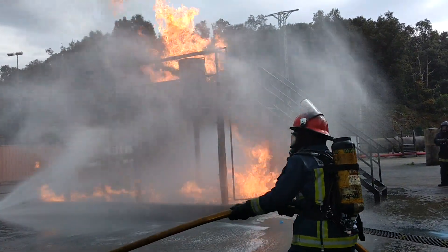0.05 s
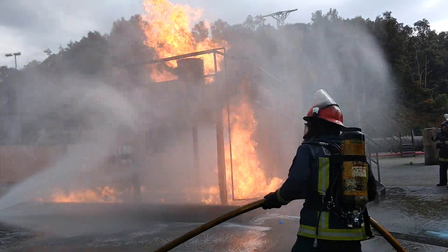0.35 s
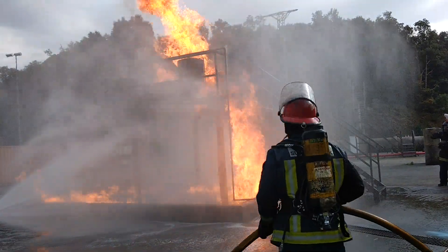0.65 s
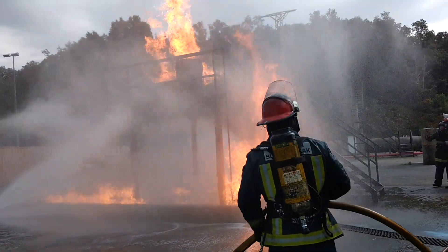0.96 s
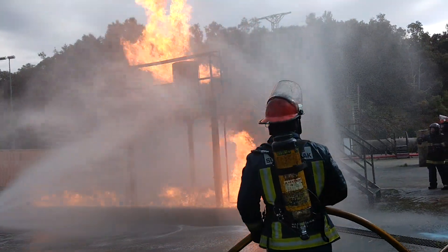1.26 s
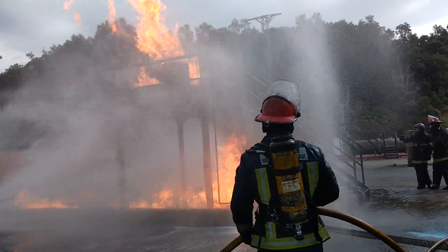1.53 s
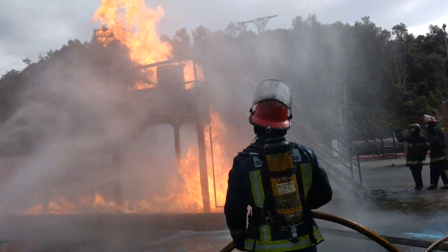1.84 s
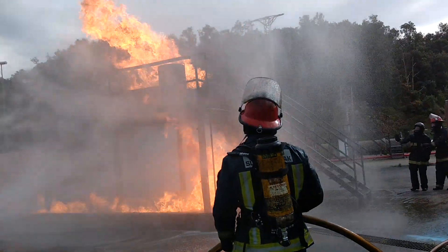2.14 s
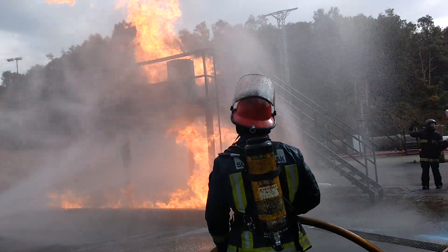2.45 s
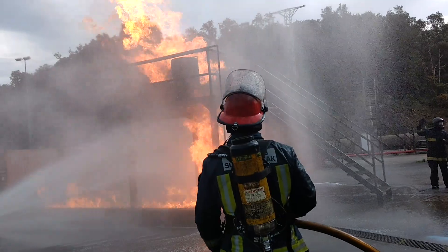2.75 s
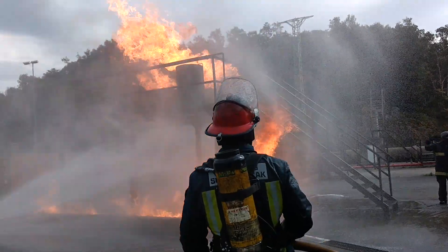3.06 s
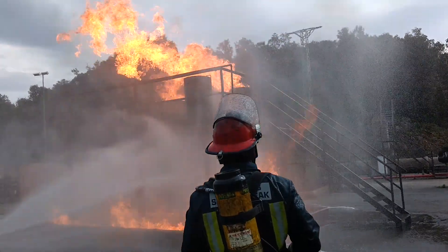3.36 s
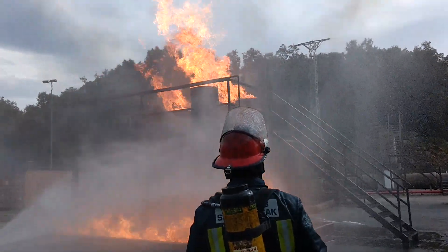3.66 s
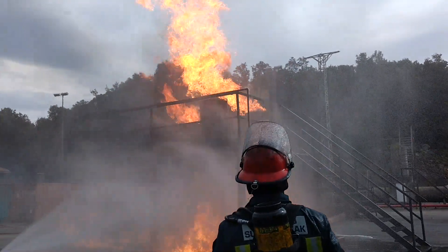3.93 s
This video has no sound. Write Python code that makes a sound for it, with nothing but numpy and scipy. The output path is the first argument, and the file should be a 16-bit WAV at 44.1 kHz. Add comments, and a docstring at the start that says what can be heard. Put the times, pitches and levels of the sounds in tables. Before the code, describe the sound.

Fire hoses rush and hiss steadily over low rumbling flames in an open yard.

```python
"""An open yard, where fire hoses play on a burning steel frame. The flames rumble, the jets drum and
splash on the steel, the spray hisses and its drops patter down. Gusts thump on the microphone, and a
thin whistle sounds near the end. Fire and water lie to one side, so the right channel hears the water
a little before the left."""
import sys
import numpy as np
from scipy import signal
from scipy.fft import rfft, irfft, next_fast_len
from scipy.io import wavfile
from scipy.ndimage import uniform_filter1d, map_coordinates

SR = 44100
rng = np.random.default_rng(int(sys.argv[2]) if len(sys.argv) > 2 else 0)


def generate_wav(signal):
    """Clip the signal to [-1, 1] and save it as 16-bit WAV at the path in sys.argv[1]."""
    frames = np.transpose(np.atleast_2d(signal))
    scaled = np.clip(frames, -1, 1) * 32767
    pcm = np.round(scaled).astype(np.int16)
    wavfile.write(sys.argv[1], SR, pcm)


N = 176400
TIME = np.arange(N) / SR


def amp(db):
    """Decibels to gain."""
    return 10 ** (np.asarray(db) / 20)


def unit_rms(x):
    """Normalise to rms 1."""
    return x / np.sqrt(np.mean(x ** 2) + 1e-20)


def over_frequency(points, hz):
    """Read (f/Hz, value) breakpoints on a log frequency axis."""
    freqs, values = np.transpose(points)
    return np.interp(np.log(hz + 1), np.log(freqs + 1), values)


def envelope(points):
    """Join (t/s, value) breakpoints, one value per sample."""
    return np.interp(TIME, *np.transpose(points))


def wobble(knots_per_s):
    """A smooth random modulator."""
    return map_coordinates(rng.standard_normal(1000), [TIME * knots_per_s + 2], mode="wrap")


def filtered(x, response):
    """Apply a complex frequency response."""
    size = next_fast_len(N + SR // 4)
    return irfft(rfft(x, size) * response(np.fft.rfftfreq(size, 1 / SR)), size)[..., :N]


def noise(eq, side_db, patchy_db):
    """Stereo noise of rms 1, mottled in time and frequency; side_db sets its width."""
    spectra = signal.stft(rng.standard_normal((2, N)), nperseg=512)[2]
    patches = uniform_filter1d(rng.standard_normal(spectra.shape[1:]), size=9, axis=0)
    patches = unit_rms(uniform_filter1d(patches, size=14, axis=1))
    mottled = signal.istft(spectra * amp(patchy_db * patches), nperseg=512)[1][:, :N]
    mid, side = filtered(mottled, lambda hz: amp(over_frequency(eq, hz)))
    return unit_rms(np.array([mid + amp(side_db) * side, mid - amp(side_db) * side]))


# Breeze bed between gusts: t/s, level/dB
BREEZE_LEVEL = [(0, -47), (.6, -43), (1.2, -50), (1.8, -44), (2.1, -40), (2.5, -43), (3.1, -40),
                (3.5, -38.5), (4, -41)]
# Gust hits: t/s, relative level/dB, half-width/s
GUST_HITS = [(0.44, -29.8, 0.03), (0.685, -23, 0.026), (0.726, -26, 0.03), (1.983, -24, 0.05),
             (2.132, -32, 0.03), (2.186, -25, 0.033), (2.566, -15, 0.015), (2.604, -25, 0.035),
             (2.8, -22, 0.03), (2.904, -24, 0.02), (2.943, -24, 0.04), (3.406, -29.2, 0.037),
             (3.46, -25, 0.027)]
# Bass-heavy tone of the buffeting: f/Hz, level/dB
WIND_EQ = [(20, -32), (35, -27), (55, -7), (80, 0), (110, 0), (160, -3), (220, -11), (320, -18), (600, -37),
           (1500, -65)]
def wind():
    """Eddies push the two channels in opposite directions: a light flutter and short thumps."""
    eddies = noise(WIND_EQ, side_db=-18, patchy_db=2.0) * np.array([[1], [-1]])
    gain = amp(envelope(BREEZE_LEVEL) + 3.3 * wobble(18))
    for peak_s, db, half_width in GUST_HITS:
        swell = np.exp(-2 * ((TIME - peak_s) / half_width) ** 2)
        local_rms = np.sqrt(np.average(eddies[0] ** 2, weights=swell ** 2))
        gain += amp(db - 8.0) * swell / local_rms
    return gain * eddies


# Whistle notes: t/s, length/s, starting f/Hz, level/dB
WHISTLE_NOTES = [(3.51, .08, 13830, -46), (3.655, .175, 13790, -49.5), (3.84, .11, 13770, -49.5)]
def whistle(sag_hz_per_s=450, waver_hz=14):
    """A faint, very high whistle comes and goes, sagging in pitch."""
    out = np.zeros(N)
    for start, length, hz, db in WHISTLE_NOTES:
        age = np.clip(TIME - start, 0, length)
        pitch = hz - sag_hz_per_s * age + waver_hz * wobble(50)
        fade = np.sqrt(np.abs(np.sin(np.pi * age / length)))
        out += amp(db) * fade * np.sin(2 * np.pi * np.cumsum(pitch) / SR)
    return out


def drops(per_s=900, centre_hz=4500, spread_octaves=2.6, cycles_per_20_db=3.5, level_db=-48):
    """Drops tick on the wet ground, each a few damped cycles."""
    when, pitch, size, pan = rng.random((4, int(per_s * N / SR), 1))
    hz = centre_hz * 2 ** (spread_octaves * (pitch - .5))
    age_samples = np.arange(160)
    cycles = hz * age_samples / SR
    accent_db = -2.5 * np.log(size + 1e-3)  # many soft ticks, a few loud ones
    ticks = amp(accent_db - 20 * cycles / cycles_per_20_db) * np.sin(2 * np.pi * cycles)
    slots = ((when * N).astype(int) + age_samples).ravel()
    patter = [np.bincount(slots, (ticks * gain).ravel(), N)[:N] for gain in (.5 + pan, 1.5 - pan)]
    return amp(level_db) * unit_rms(np.array(patter))


# Fader ride of the flames: t/s, relative level/dB
FIRE_LEVEL = [(0.0, -32), (0.08, -36.5), (0.18, -34), (0.4, -37.5), (0.51, -35.5), (0.56, -31),
              (0.63, -35.5), (0.83, -33.8), (1.1, -34), (1.14, -36), (1.65, -35), (1.9, -36), (2.27, -35),
              (2.7, -37.8), (2.95, -37.5), (3.23, -39.5), (3.29, -35.5), (3.45, -35.7), (3.65, -38),
              (3.7, -44), (3.82, -40), (3.93, -47), (4.0, -41)]
# Their low rumble: f/Hz, level/dB
FIRE_EQ = [(25, -40), (45, -24), (65, -12.5), (90, -4), (125, -2), (160, 0.5), (245, 0.5), (320, -8),
           (450, -26), (900, -57)]
def fire():
    """The flames rumble and flutter."""
    gain = amp(envelope(FIRE_LEVEL) - 0.1 + 0.37 * wobble(11))
    return gain * noise(FIRE_EQ, side_db=-14.5, patchy_db=-0.06)


# Fader rides of spray and mist: t/s, relative level/dB
SPRAY_LEVEL = [(0.0, -34.5), (0.45, -33.5), (0.64, -34.5), (0.78, -33.3), (0.99, -32), (1.04, -34),
               (1.58, -35.5), (1.69, -34), (1.94, -36), (2.39, -34), (2.51, -32.5), (2.62, -36), (2.9, -36),
               (3.04, -34.5), (3.24, -37), (3.3, -32.5), (3.33, -36), (3.38, -32.8), (3.51, -36.2),
               (3.6, -31.5), (3.64, -35.5), (3.675, -32), (3.72, -36), (3.89, -38.5), (4.0, -37)]
MIST_LEVEL = [(0.0, -40), (0.11, -36), (0.52, -40), (0.81, -37.5), (0.95, -39), (1.38, -39.5),
              (1.45, -40.3), (1.73, -38.5), (2.39, -38), (2.48, -36.5), (2.62, -38), (2.68, -39.5),
              (2.74, -38.5), (2.88, -41.5), (3.04, -38), (3.17, -41), (3.4, -38), (3.48, -41), (3.6, -37),
              (3.65, -39.5), (3.77, -38), (3.82, -41.7), (4.0, -40)]
# Bright hiss of the spray, airy top of the mist: f/Hz, level/dB
SPRAY_EQ = [(1600, -51), (2350, -5), (2700, -0.5), (3100, -0.5), (3550, -2), (4200, -0.6), (5300, -1.5),
            (6300, -3), (7200, -20), (11000, -44)]
MIST_EQ = [(4000, -40), (6000, -13.5), (6800, -0.5), (8000, 0.5), (9200, 0.8), (10200, -3.5), (11000, -5.5),
           (12700, -4.5), (14200, -11), (15400, -9)]
def spray():
    """Coarse spray and fine mist hiss, surging together."""
    surge_db = .45 * wobble(18)
    coarse = amp(envelope(SPRAY_LEVEL) + 2.5 + surge_db) * noise(SPRAY_EQ, side_db=-27.5, patchy_db=1.0)
    mist = amp(envelope(MIST_LEVEL) + 4.0 + surge_db) * noise(MIST_EQ, side_db=-12.5, patchy_db=1.02)
    return coarse + mist


# Splash hits on the steel: t/s, peak level/dB
SPLASH_HITS = [(0.106, -28.5), (0.863, -35), (1.628, -26), (1.721, -23), (1.966, -29), (2.971, -27)]
# Their midrange slap: f/Hz, level/dB
SPLASH_EQ = [(300, -22), (700, -8.5), (1100, -0.5), (1400, -1), (1900, 0.5), (2600, -18), (5000, -33)]
def splashes(rise_s=0.015, fall_s=0.0079):
    """Each slug of water swells against the steel and stops short."""
    gain = np.zeros(N)
    for peak_s, db in SPLASH_HITS:
        gain += amp(db) * np.exp(-np.maximum((peak_s - TIME) / rise_s, (TIME - peak_s) / fall_s))
    return gain * noise(SPLASH_EQ, side_db=-17, patchy_db=0.5)


# Fader rides of the jets' drumming and rush: t/s, relative level/dB
DRUM_LEVEL = [(0.0, -35), (0.12, -31), (0.28, -34), (0.38, -31), (0.4, -33.5), (1.43, -34.5), (1.72, -29),
              (1.76, -32.3), (2.1, -34), (2.44, -31.5), (2.46, -36), (2.51, -32.5), (2.85, -37),
              (3.3, -33.5), (3.59, -35), (3.75, -40.5), (3.79, -40), (4.0, -37.5)]
RUSH_LEVEL = [(0.0, -39), (0.01, -43.5), (0.44, -39), (1.36, -41), (1.73, -37), (1.74, -40), (2.16, -41),
              (2.27, -36.5), (2.78, -42.5), (3.23, -37.5), (3.26, -40.5), (3.64, -41), (3.69, -44.5),
              (4.0, -40)]
# Body of the drumming, upper mids of the rush: f/Hz, level/dB
DRUM_EQ = [(180, -24), (330, -6.5), (450, -1), (600, 0), (760, -4.5), (1000, -2.05), (1280, -3.5),
           (1550, -16), (2400, -48)]
RUSH_EQ = [(800, -43), (1200, -14.5), (1400, -3), (1600, -2), (1860, 2.5), (2100, -2.5), (2350, -12),
           (2700, -19), (4000, -55)]
def jets():
    """Solid water drums on the frame, with a brighter rush above it."""
    drum_gain = amp(envelope(DRUM_LEVEL) + 0.5 + 0.57 * wobble(29.93))
    drum = drum_gain * noise(DRUM_EQ, side_db=-12.0, patchy_db=0.5)
    rush_gain = amp(envelope(RUSH_LEVEL) + 7.5 + 0.27 * wobble(15))
    rush = rush_gain * noise(RUSH_EQ, side_db=-14, patchy_db=1.5)
    return drum + rush


# Stereo phase in the lows and mids: f/Hz, left lead/rad
LEFT_PHASE = [(0, 2.5), (300, 0), (390, 0), (550, -0.5), (700, 0.1), (850, 0.5), (1200, -1), (1400, -1.93),
              (1600, -3), (1790, -3.5)]
# Stereo balance: f/Hz, level of left over right/dB
LEFT_BALANCE = [(60, 5), (150, 3.5), (250, 2.5), (330, 8.5), (420, 1), (520, 0.5), (800, 1.9), (1000, 1),
                (1350, -4.5), (1850, 0.1), (2250, 2.5), (2550, -4.5), (3000, 0)]
def microphones(x, left_lag_s=.000559):
    """Sound from one side reaches the left late; the body holding the pair shades each differently."""
    def response(hz):
        treble_phase = np.pi - 2 * np.pi * hz * left_lag_s  # a delay plus a polarity flip
        phase = np.where(hz < 1 / left_lag_s, over_frequency(LEFT_PHASE, hz), treble_phase)
        left = amp(over_frequency(LEFT_BALANCE, hz) / 2) * np.exp(.5j * phase)
        return np.array([left, 1 / left])
    return filtered(x, response)


def scene():
    """The mix: fire and water off to one side, the whistle in the centre, wind on top."""
    return microphones(fire() + jets() + splashes() + spray() + drops()) + whistle() + wind()


def record(dry, cutoff_hz=15520):
    """A brick-wall low-pass on the master."""
    return filtered(dry, lambda hz: hz < cutoff_hz)


dry = scene()
out = record(dry)
generate_wav(out)
```